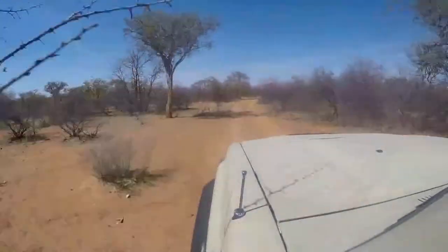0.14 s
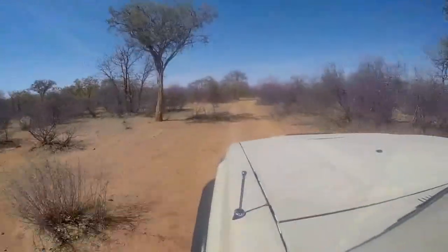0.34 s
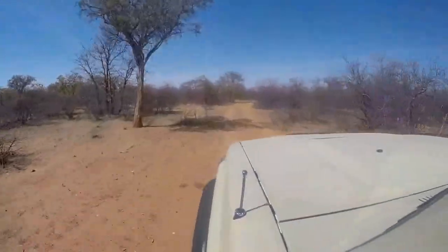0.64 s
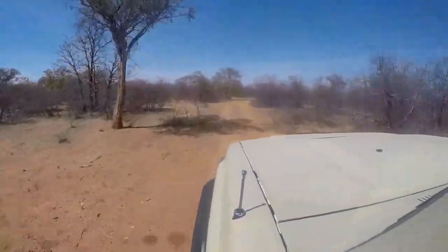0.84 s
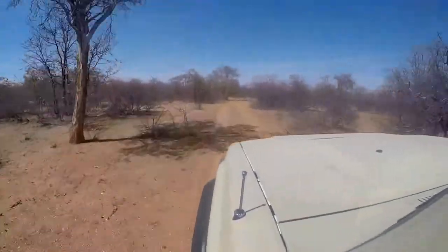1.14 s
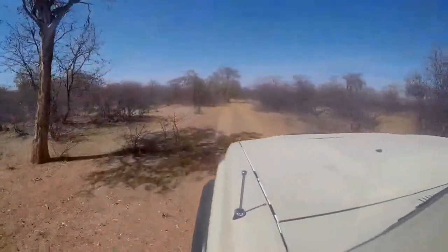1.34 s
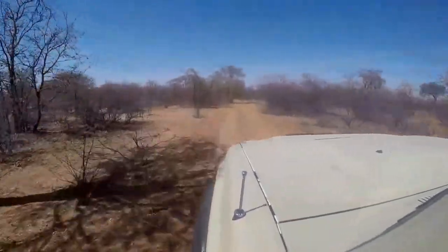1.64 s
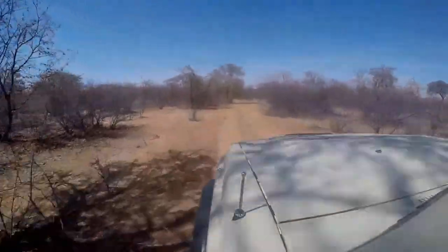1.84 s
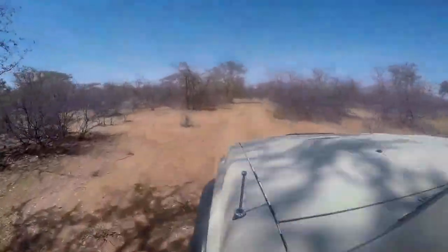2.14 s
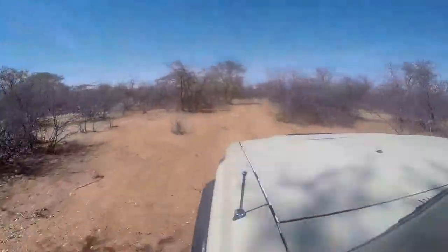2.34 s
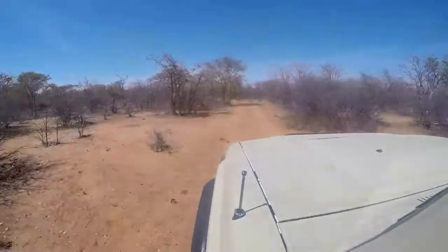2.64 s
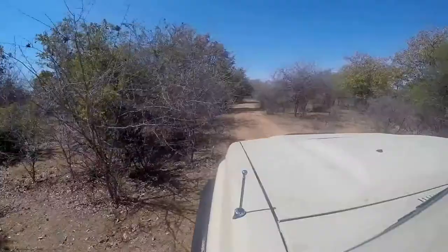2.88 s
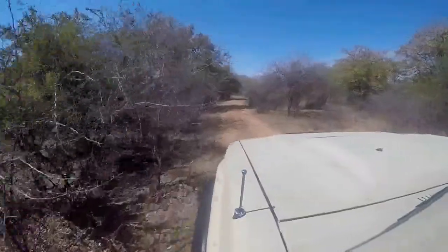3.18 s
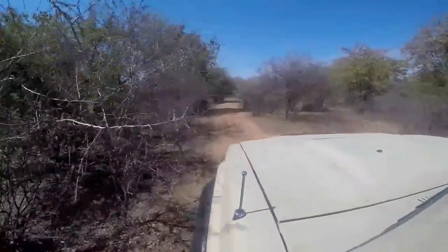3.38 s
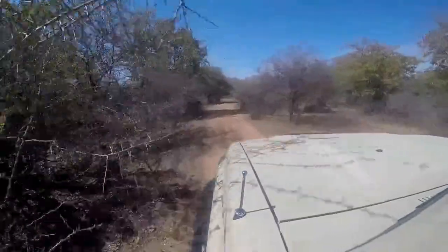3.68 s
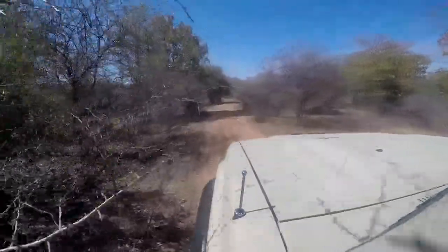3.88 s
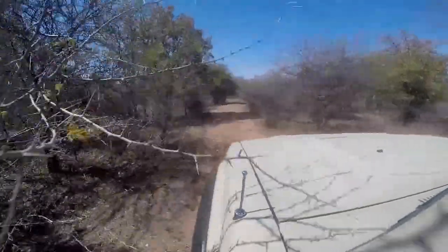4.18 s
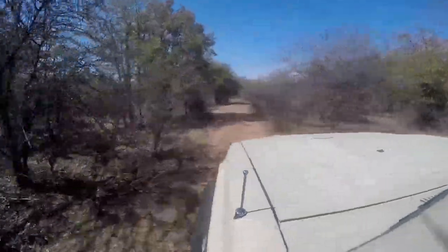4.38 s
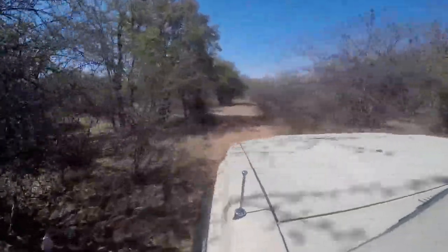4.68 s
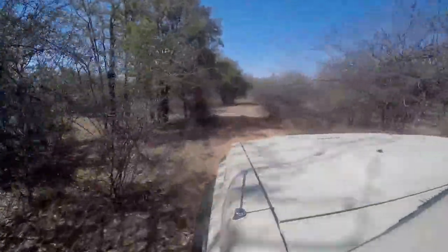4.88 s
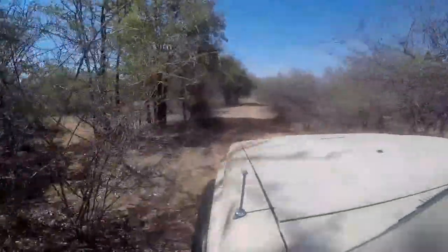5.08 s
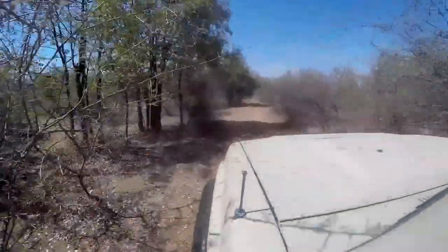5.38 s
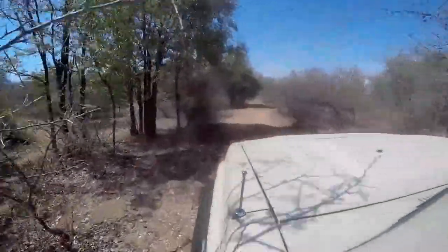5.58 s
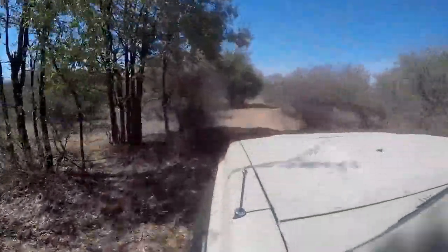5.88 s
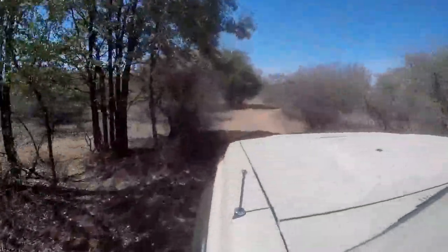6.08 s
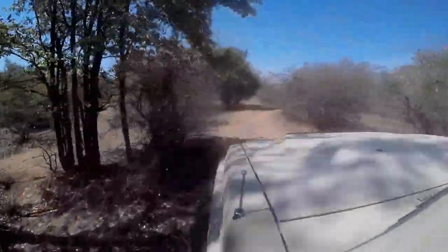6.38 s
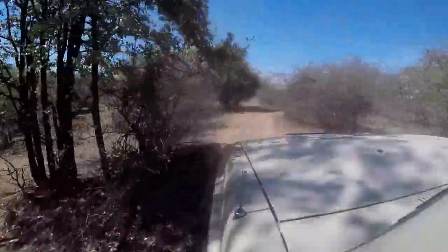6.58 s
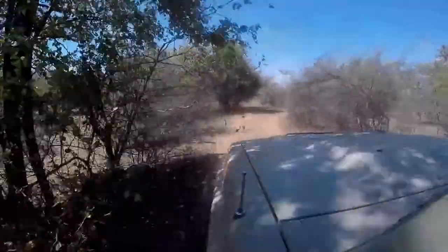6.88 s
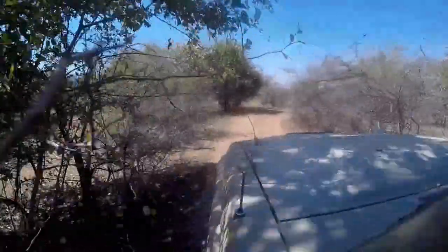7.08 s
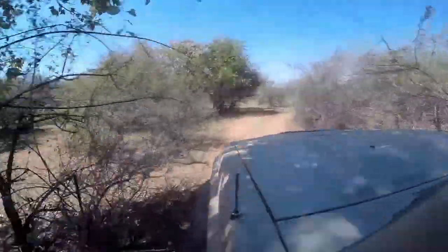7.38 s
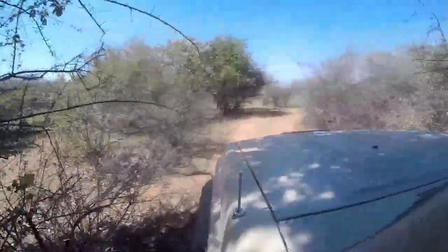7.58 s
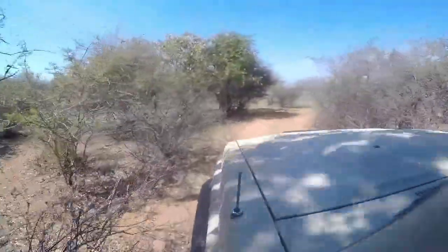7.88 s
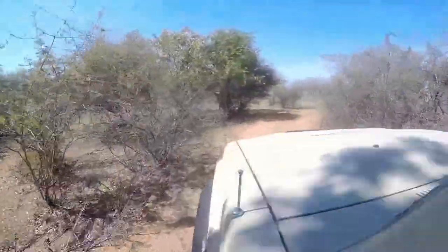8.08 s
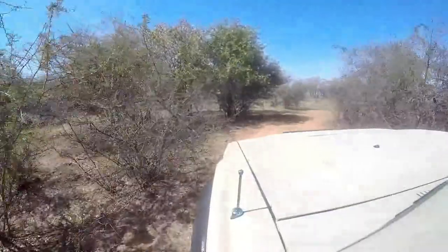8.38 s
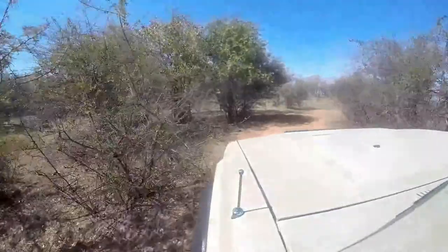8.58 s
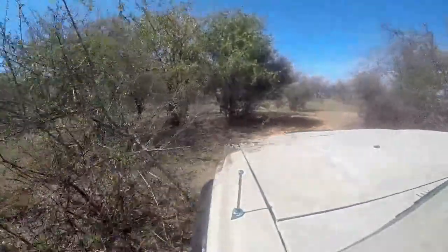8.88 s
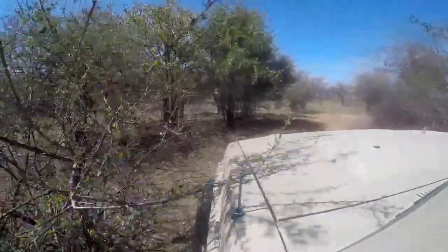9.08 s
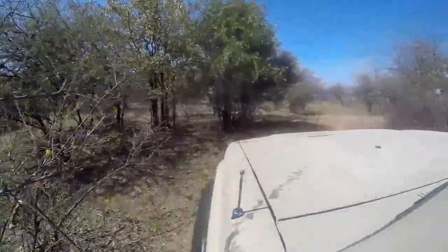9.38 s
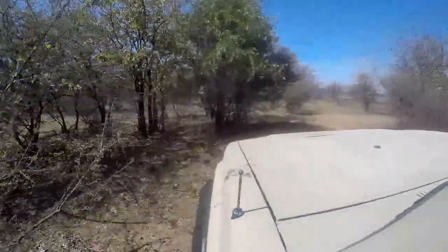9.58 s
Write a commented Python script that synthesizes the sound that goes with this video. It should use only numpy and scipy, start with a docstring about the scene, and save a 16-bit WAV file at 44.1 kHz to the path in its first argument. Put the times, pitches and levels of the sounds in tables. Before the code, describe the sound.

Wind buffets a small microphone on a vehicle rolling down a sandy bush track while thorny twigs crackle, squeal and whip its panels.

```python
"""A thump of wind on the microphone opens the scene, and at once branches smack hard against metal.
A four-wheel-drive rolls slowly along a sandy bush track, heard from a small camera beside the bonnet.
Wind and the drone of engine and tyres are shaped noise that rises and dips along level curves.
Bushes brush along the side as crackling, hissing noise; single branches set body panels ringing.
Narrow noise makes thorn squeals and faint high chirps; wavering tones make a faint gear whine."""
import sys
import numpy as np
from scipy import signal
from scipy.fft import rfft, irfft
from scipy.io import wavfile
from scipy.ndimage import uniform_filter1d

SR = 44100
rng = np.random.default_rng(int(sys.argv[2]) if len(sys.argv) > 2 else 0)


def unload_audio(sound):
    """Save the sound as a 16-bit wav file, at the path given as the first command line argument."""
    columns = np.transpose(np.atleast_2d(sound))
    # keep every value between -1 and 1, then stretch to whole-number steps
    steps = np.round(np.clip(columns, -1, 1) * 32767)
    wavfile.write(sys.argv[1], SR, steps.astype(np.int16))


N = 429534

# gusts: peak_s, swell_db of the buffeting, thump_db, thump_width_s (peak to 1/e)
GUST_TABLE = [(-0.008, 12, -14.5, 0.02), (0.316, 7.5, -23.5, 0.016), (0.589, 12, -25, 0.015),
              (0.967, 12, -21.5, 0.033), (2.791, 17.5, -13, 0.028), (3.081, 4, -19, 0.0053),
              (4.157, 11.5, -35, 0.014), (7.058, 7, -44, 0.014), (7.356, 6, -16, 0.0096),
              (7.393, 3.5, -11, 0.0046)]
# resonances of body panels and housing: pitch_hz, width_hz before widening, relative level_db
BODY_MODES = [(743, 70, 0), (969, 25, -7), (1300, 36, -7), (1870, 49, -8), (2470, 85, -2), (3080, 66, -1),
              (3330, 110, -3), (3670, 33, -6), (4000, 52, -3), (4510, 140, -8), (4830, 51, -7),
              (5710, 65, -10), (6420, 300, -11)]
# airy high noise, for leaves and the top of the drone: pitch_hz, relative level_db (per Hz)
AIRY_SPECTRUM = [(2350, -37), (4000, 6), (4760, 13), (5300, 11), (7170, -0.5), (11300, -3.5), (14300, -3.5),
                 (15300, -3)]
THUD_BELOW_HZ = 1150  # splits the body modes into thud and ring


def from_db(db):
    """Turn decibels into a gain."""
    return 10 ** (np.asarray(db) / 20)


def rms_one(x):
    """Scale a sound to an average strength (rms) of 1."""
    return x / np.sqrt(np.mean(x ** 2) + 1e-20)


def in_time(rows):
    """Draw straight lines between the rows: one curve for each column after the time."""
    times, *columns = np.transpose(rows)
    return [np.interp(np.arange(N) / SR, times, column) for column in columns]


def drift(rate_hz):
    """Slow random wandering of spread 1, made at every 40th sample and joined by lines."""
    r = np.exp(-80 * np.pi * rate_hz / SR)
    noise = rng.standard_normal(N // 40 + 2002)
    slow = signal.lfilter([1], [1, -2 * r, r * r], noise)[2000:]
    return np.interp(np.arange(N) / 40, np.arange(len(slow)), rms_one(slow))


def colour(x, spectrum):
    """Give steady noise a spectrum, at rms 1."""
    hz, db = np.transpose(spectrum)
    f = np.maximum(np.fft.rfftfreq(N, 1 / SR), 1)
    curve_db = np.interp(np.log(f), np.log(hz), db, -90, -90)
    return rms_one(irfft(rfft(x) * from_db(curve_db), N))


def resonate(x, hz, width_hz):
    """Pass sound through one resonance whose top has gain 1."""
    r = np.exp(-np.pi * width_hz / SR)
    top = np.array([1, 0, -1]) * (1 - r * r) / 2
    return signal.lfilter(top, [1, -2 * r * np.cos(2 * np.pi * hz / SR), r * r], x + 1e-18)


def band(x, low_hz, high_hz):
    """Keep one band of pitches, at rms 1."""
    sections = signal.butter(2, [low_hz, high_hz], "band", fs=SR, output="sos")
    return rms_one(signal.sosfilt(sections, x))


def grains(per_s, spread_db):
    """Random contacts of very unequal size, at rms 1."""
    luck_db = spread_db * np.minimum(rng.exponential(1, N), 5)
    sizes = from_db(luck_db) * rng.choice([-1, 1], N)
    return rms_one(sizes * (rng.random(N) < per_s / SR))


def crackle(per_s, spread_db, ring_s):
    """A gain that jumps at each chance touch of a twig and dies quickly, at rms 1."""
    touches = np.abs(grains(per_s, spread_db))
    jumps = signal.lfilter([1], [1, -np.exp(-1 / (ring_s * SR))], touches)
    return rms_one(.5 + rms_one(jumps))


def touch(start_s, length_s, attack_s, release_s):
    """A gain that climbs from 0 to 1, holds, and dies away after its length."""
    t = np.arange(N) / SR - start_s
    return np.clip(t / attack_s, 0, 1) * np.exp(-np.maximum(t - length_s, 0) / release_s)


def strands(modes):
    """Dragged thorns catch panel after panel: each mode swells and fades on its own; rms 1."""
    out = 0
    for hz, width_hz, db in modes:
        catch = from_db(db + 6 * drift(12))
        out = out + catch * rms_one(resonate(grains(1500, 2.5), hz, width_hz + 60))
    return rms_one(out)


def ring_body(contacts, modes, favoured_hz=3000, favour_db=0., luck_db=0.):
    """Contacts set body modes ringing; a boost can favour those near one pitch; rms 1."""
    out = 0
    for k, (hz, width_hz, db) in enumerate(modes):
        near_db = favour_db * np.exp(-(np.log(hz / favoured_hz) / .12) ** 2)
        wide_hz = 1.2 * width_hz + 50
        gain = from_db(db + near_db + luck_db * rng.standard_normal())
        # neighbouring modes alternate in sign
        out = out + (-1) ** k * gain * resonate(contacts, hz, wide_hz) / np.sqrt(wide_hz)
    return rms_one(out)


def wind():
    """Eddies shake the microphone membrane; faster rumble comes in lumps on the pressure peaks."""
    # before the gusts: time_s, buffet_db, rumble_db
    wind_levels = [(0, -16, -26.5), (.9, -18, -29.5), (1.4, -12.5, -26), (2.7, -14.5, -23),
                   (2.93, -24.5, -30), (3.2, -10.5, -27.5), (4.0, -16, -23), (4.3, -18, -28),
                   (4.66, -22.5, -43), (4.9, -28, -42.5), (5.7, -20.5, -30.5), (6.0, -14.5, -29),
                   (6.85, -13.5, -31.5), (7.3, -21.5, -33), (7.58, -33.5, -45), (8.1, -35.5, -43.5),
                   (8.9, -18, -35.5), (9.4, -16.5, -25), (9.74, -28.5, -41)]
    # slow shaking: pitch_hz, relative level_db (per Hz)
    buffet_spectrum = [(8.8, -41), (15, 2), (27, 1.5), (42, 1), (74, -6), (163, -23), (200, -26),
                       (260, -27.5), (440, -120)]
    # faster rumble: pitch_hz, relative level_db (per Hz)
    rumble_spectrum = [(65, -55), (110, 2), (271, -8.5), (311, -6), (380, -10.5), (518, -11), (863, -25.5),
                       (1200, -91), (1560, -42), (2640, -120)]
    swell_s = 0.049  # from a gust's peak until its extra dB fall to 1/e

    buffet_db, rumble_db = in_time(wind_levels)
    buffet = colour(rng.standard_normal(N), buffet_spectrum)
    lumps = from_db(2 * drift(14) + 1.2 * np.abs(buffet))
    rumble = rms_one(lumps * colour(rng.standard_normal(N), rumble_spectrum))
    # the shaking is held steadier in strength than plain noise
    swing = np.sqrt(uniform_filter1d(buffet ** 2, size=1800) + .05)
    buffet = rms_one(buffet / swing ** 0.11)
    t = np.arange(N) / SR
    gust_db = sum(db * np.exp(-((t - peak_s) / swell_s) ** 2) for peak_s, db, *_ in GUST_TABLE)
    return from_db(buffet_db + gust_db) * buffet + from_db(rumble_db) * rumble


def thumps():
    """Gusts thump the microphone: short dull bursts of turbulence, made of low noise."""
    t = np.arange(N) / SR
    swell = sum(from_db(db) * np.exp(-((t - peak_s) / width_s) ** 2)
                for peak_s, _, db, width_s in GUST_TABLE)
    return swell * band(rng.standard_normal(N), 170, 455)


def drone():
    """Engine and tyres give a smooth hiss, while small random contacts make a panel hum."""
    # time_s, hiss_db, panel hum_db
    drone_levels = [(0, -31, -35), (.75, -43.5, -40), (1.1, -45.5, -44.5), (1.7, -43, -38),
                    (2.7, -42.5, -39), (2.88, -48, -42), (3.08, -48.5, -42), (3.14, -41, -35),
                    (4.23, -42, -37.5), (4.64, -65, -51), (4.8, -54.5, -52), (5.5, -57.5, -49),
                    (6.2, -47, -38.5), (7.3, -52, -41), (7.6, -48.5, -40), (8.1, -63, -53.5),
                    (8.6, -53.5, -40.5), (9.74, -33, -38)]
    # main part of the hiss: pitch_hz, relative level_db (per Hz)
    hiss_spectrum = [(530, -41), (900, 12.5), (1150, 11), (1500, 6), (1640, 10), (2470, 7.5), (3030, 9.5),
                     (3600, 0), (4770, -2), (5200, 1.5), (9000, -27.5), (11700, -99), (19800, -120)]
    # narrow bands in the hiss: pitch_hz, width_hz, level_db against its main part
    engine_bands = [(1590, 44, -13.5), (2903, 85, -6.5)]
    airy_db = -15.5  # airy top, against the main part of the hiss

    hiss_db, hum_db = in_time(drone_levels)
    hiss = colour(rng.standard_normal(N), hiss_spectrum)
    for hz, width_hz, db in engine_bands:
        hiss = hiss + from_db(db) * rms_one(resonate(rng.standard_normal(N), hz, width_hz))
    hiss = hiss + from_db(airy_db) * colour(rng.standard_normal(N), AIRY_SPECTRUM)
    hum = band(resonate(grains(800, 1.6), 627, 96), 300, 1500)
    return from_db(hiss_db) * hiss + from_db(hum_db) * hum


def whines():
    """Gears whine faintly: a tone wavers in pitch and strength as it fades in and out."""
    # start_s, length_s, first_pitch_hz and last_pitch_hz before wavering, level_db before flutter
    whine_table = [(2.351, 0.695, 424, 416.8, -36), (4.902, 1.1, 601, 553, -47)]
    out, t = np.zeros(N), np.arange(N) / SR
    waver, flutter = drift(7.0), from_db(7.2 * drift(4.8))
    for start_s, length_s, first_hz, last_hz, db in whine_table:
        glide_hz = np.interp(t, [start_s, start_s + length_s], [first_hz, last_hz])
        turn = 2 * np.pi * np.cumsum(glide_hz * (1 + 0.00733 * waver)) / SR
        fade = touch(start_s, length_s, 0.29, 0.039)
        out += fade * from_db(db) * flutter * np.sqrt(2) * np.sin(turn)
    return out


def chirps():
    """Faint high chirps: short puffs of noise in two narrow bands."""
    # start_s, level_db before the puff is smoothed
    chirp_table = [(2.6015, -45), (2.9682, -53), (3.5224, -47), (3.7494, -42), (4.0372, -45), (5.413, -51),
                   (6.2622, -43), (6.9097, -38)]
    # pitch_hz, width_hz of each of two passes, level_db
    chirp_bands = [(13460, 440, -3), (9700, 400, -14.5)]
    start_s, db = np.transpose(chirp_table)
    starts = np.zeros(N)
    starts[np.round(start_s * SR).astype(int)] = from_db(db)
    r = np.exp(-1 / (0.022 * SR))  # each puff dies over 22 ms
    puffs = uniform_filter1d(signal.lfilter([1], [1, -r], starts + 1e-18), size=300)
    noise = rng.standard_normal(N)
    tone = 0
    for hz, width_hz, level_db in chirp_bands:
        narrow = resonate(resonate(noise, hz, width_hz), hz, width_hz)
        tone = tone + from_db(level_db) * rms_one(narrow)
    return puffs * tone


def brushes():
    """Bushes drag along the side: twigs crackle on panels, leaves hiss, the low panels scrape."""
    # start_s, length_s, twigs_db, leaves_db, low_scrape_db, change_db over the pass
    brush_table = [(0.034, 0.34, -25, -38.5, -25, -4), (0.312, 0.56, -41, -39.5, -38.5, -14),
                   (2.05, 0.36, -42.5, -39.5, -41, -32), (2.22, 0.31, -65, -40.5, -54, -2.5),
                   (4.213, 0.44, -50, -49, -46, -0.5), (4.661, 0.96, -56, -61, -60, 1),
                   (5.6, 0.39, -49, -53, -46, 12), (5.965, 0.41, -40, -47.5, -35.5, -1.5),
                   (6.345, 0.38, -34.5, -40.5, -33, -8.5), (6.684, 0.46, -48.5, -46.5, -61, -0.5),
                   (7.124, 0.32, -51.5, -52, -41, 2), (7.6, 0.406, -49.5, -49.5, -48, -14.5),
                   (7.845, 0.29, -50, -50, -72, -5), (8.12, 0.74, -43.5, -45.5, -44, -2),
                   (8.77, 0.87, -51.5, -52, -52.5, 12), (9.273, 0.26, -39.5, -44, -24, 1),
                   (9.561, .25, -44, -51, -25, -6.5)]
    attack_s, release_s = 0.039, 0.00073

    touching = crackle(160, 2.6, .003)
    patter = grains(8000, 2.5) * touching
    high = [mode for mode in BODY_MODES if mode[0] > THUD_BELOW_HZ]
    twigs = rms_one(strands(high) + 1.3 * band(patter, 1070, 4100))
    leaves = colour(rng.standard_normal(N) * (0.26 + touching), AIRY_SPECTRUM)
    low_panels = strands(BODY_MODES[:1]) + .3 * strands(BODY_MODES[1:3])
    scrape = rms_one(low_panels + .5 * band(patter, 480, 900))
    strength, t = np.zeros((3, N)), np.arange(N) / SR
    for start_s, length_s, *levels_db, change_db in brush_table:
        change = from_db(change_db * np.clip((t - start_s) / length_s, 0, 1))
        shape = change * touch(start_s, length_s, attack_s, release_s)
        strength += from_db(levels_db)[:, None] * shape
    return np.sum(strength * [twigs, leaves, scrape], axis=0)


def squeals():
    """A thorn squeals on paint: gritty noise around a slightly sagging pitch swells and fades."""
    # start_s, length_s, first pitch_hz, level_db before the swell and fade
    squeal_table = [(0.16, 0.18, 1270, -27), (0.16, 0.15, 3230, -30), (0.064, 0.11, 2305, -31),
                    (2.243, 0.045, 1320, -29), (2.297, .09, 3150, -40), (5.04, 0.08, 4950, -51),
                    (5.128, 0.24, 5030, -49), (5.81, .155, 760, -25), (6.48, 0.22, 5000, -36),
                    (9.3, .1, 760, -28), (9.554, 0.079, 2080, -32), (0.608, 0.1, 5150, -43),
                    (8.29, 0.37, 4940, -45), (8.66, 0.045, 5150, -41)]
    sag, half_width = .03, .052  # shares of the pitch
    out = np.zeros(N)
    grit = from_db(3 * drift(25) - 2) * crackle(400, 2., .003)
    noise = rng.standard_normal((2, N)) * grit
    for start_s, length_s, hz, db in squeal_table:
        at = round(start_s * SR)
        done = np.arange(round(length_s * SR)) / (length_s * SR)
        span = slice(at, at + len(done))
        low_pass = signal.butter(1, half_width * hz, fs=SR, output="sos")
        wobble = rms_one(signal.sosfilt(low_pass, noise[:, span]))
        turn = 2 * np.pi * np.cumsum(hz * (1 - sag * done)) / SR
        # slow noise on a cosine and a sine makes a narrow band around the pitch
        squeal = wobble[0] * np.cos(turn) + wobble[1] * np.sin(turn)
        out[span] += from_db(db) * np.sin(np.pi * done) ** .5 * squeal
    return out


def twig_skips():
    """A springy twig skips along a ridge: evenly spaced small blows of uneven strength."""
    start_s, skips_per_s, skips = 6.9315, 117, 9
    loudest_db, thud_db, pitch_hz, contact_s = -24, -22, 4100, .002
    return [(start_s + k / skips_per_s, loudest_db - 9 * rng.random(), thud_db, pitch_hz, contact_s)
            for k in range(skips)]


def whips():
    """Branches whip the body: a rattle of contacts rings low and high modes and adds a crack."""
    # start_s, ring_db, thud_db against the ring, favoured pitch_hz, contact_s
    blow_table = [(0.064, -25, -13, 1910, 0.027), (.066, -32, -9, 4500, 0.05),
                  (0.152, -12.5, -1.5, 2000, 0.0028), (0.158, -4, -9.5, 4500, 0.0027),
                  (0.169, -18.5, -20, 2500, 0.019), (0.305, -26, 2, 1350, 0.029),
                  (0.3448, -5, -3, 2800, 0.0011), (0.505, -34, -12, 3080, 0.0094),
                  (2.243, -30.5, 1.5, 1870, 0.053), (2.275, -27, -6, 4730, 0.0043),
                  (2.298, -35.5, 2, 4830, 0.1), (2.483, -42, -20, 4770, 0.013),
                  (3.185, -44, 21, 1290, 0.0033), (3.8598, -17.5, 9.5, 2380, 0.012),
                  (4.199, -28, -20, 5670, 0.0075), (4.2669, -7, -0.5, 2740, 0.009),
                  (4.268, -12.5, -3, 1330, 0.017), (4.294, -18, -4, 2800, 0.026),
                  (4.466, -13, 6, 2350, 0.018), (4.513, -28, 4, 1320, 0.016), (4.537, -30, 3, 1300, 0.019),
                  (4.555, -28.5, 5, 2180, 0.043), (4.5784, -6.5, 0.5, 3180, 0.0097),
                  (4.593, -13, -4, 4540, 0.0082), (4.635, -35, -31, 2550, 0.012),
                  (4.692, -43.5, -4, 3000, 0.0062), (4.714, -46.5, 6, 2500, 0.011),
                  (5.61, -50, -20, 5200, 0.0034), (5.699, -34.5, 1, 2880, 0.0056),
                  (5.748, -34.5, -22, 4900, 0.039), (5.79, -19, -5.5, 3000, 0.016),
                  (5.806, -21, -0.5, 2080, 0.059), (5.917, -34, -20, 4530, .008),
                  (5.989, -18, -10, 2000, 0.022), (5.991, -18, 0.5, 4870, 0.017),
                  (6.085, -38, -15, 4000, 0.0043), (6.187, -27, 2.5, 2100, 0.016),
                  (6.297, -34, -17, 4800, 0.0097), (6.358, -33.5, 3, 2100, 0.012),
                  (6.418, -42.5, 18.5, 1300, 0.052), (6.486, -29, -3, 2900, 0.014),
                  (6.507, -32, -15, 4700, 0.055), (6.631, -36, -12, 4500, 0.009),
                  (7.319, -10, 0.5, 3500, 0.0044), (7.33, -14, -21, 1450, 0.0059),
                  (7.341, -3, -7, 4170, 0.014), (7.356, -24.5, 12, 3000, 0.0078),
                  (7.369, -20, 1, 3100, 0.0034), (7.39, -22, 15, 1300, 0.008),
                  (7.402, -14, -23, 2020, 0.0021), (7.43, -22, -1, 2400, 0.012),
                  (7.579, -24.5, 5, 1520, 0.008), (7.603, -28.5, 5.5, 2030, 0.0049),
                  (7.616, -16.5, 1, 1300, 0.0028), (7.627, -28, 4, 2520, 0.013),
                  (7.654, -34.5, 0.5, 2530, 0.025), (7.756, -41, -18, 1900, 0.012),
                  (7.802, -41, 4.5, 2200, 0.0073), (7.884, -41, -0.5, 1330, 0.022),
                  (8.151, -31, -4, 5000, 0.0053), (8.176, -24.5, -1, 2830, 0.0089),
                  (8.21, -31, -4, 4700, 0.0029), (8.241, -36, -13, 3920, .005),
                  (8.377, -32, 0, 1550, 0.0053), (8.458, -28, -6, 4600, 0.011),
                  (8.545, -28, -23, 4100, 0.0049), (9.53, -13, -26, 2240, 0.011),
                  (9.537, -4.5, -14, 4940, 0.0066), (9.545, -7, -8, 3100, 0.0078),
                  (9.552, -8.5, -21, 3500, 0.0053), (9.57, -12.5, -19, 3700, 0.013),
                  (9.591, -20, -2.5, 2800, 0.0087), (9.6, -35, 6, 2030, 0.014),
                  (9.669, -17, -14, 2900, 0.0065)]
    slide_in, treble_s = .2, .009  # share of contact beyond 25 ms spent sliding in; treble decay
    crack_3khz_db, crack_db_per_octave, crack_s = -29, -5.5, 0.0031  # higher pitch, weaker crack
    loss_per_thud = 0.48  # dB of crack and late treble lost per dB of thud
    tail_db, tail_s = -10.5, 0.014  # two panels rattle on after the crack
    boom_hz, boom_width_hz, boom_db = 163.2, 8.5, -11  # the whole body, level against the thud

    out, t = np.zeros(N + 8192), np.arange(8192) / SR
    low = [mode for mode in BODY_MODES if mode[0] < THUD_BELOW_HZ]
    high = [mode for mode in BODY_MODES if mode[0] > THUD_BELOW_HZ]
    for start_s, ring_db, thud_db, favoured_hz, contact_s in blow_table + twig_skips():
        # quick onset (long contacts slide in), a sagging hold, then the branch lets go
        onset = np.minimum(t / (.0005 + slide_in * max(contact_s - .025, 0)), 1)
        let_go = np.maximum(t - .8 * contact_s, 0) / (.003 + .25 * contact_s)
        shape = onset * np.exp(-.9 * t / contact_s - let_go)
        uneven = from_db(3.54 * rng.exponential(1, len(t)))
        rattle = shape * rng.standard_normal(len(t)) * uneven

        ring = ring_body(rattle, high, favoured_hz, favour_db=13., luck_db=3.)
        low_pass = signal.butter(3, max(3400, 1.2 * favoured_hz), fs=SR, output="sos")
        dull = signal.sosfilt(low_pass, ring)
        # the treble dies first, and heavy thuds have less of it
        treble = (ring - dull) * np.exp(-t / treble_s) * from_db(-loss_per_thud * max(thud_db, 0))
        slap = band(rattle, favoured_hz / 1.7, favoured_hz * 1.5)
        ring = rms_one(dull + treble + .5 * slap)

        thud = band(ring_body(rattle, low) + .5 * band(rattle, 450, 900), 250, 1700)
        octaves = np.log2(favoured_hz / 3000)
        crack_db = crack_3khz_db + crack_db_per_octave * octaves - loss_per_thud * thud_db
        crack = band(rattle * np.exp(-t / crack_s), 10600, 16200)
        after = band(rng.standard_normal(len(t)), 480, 3200) * np.exp(-t / tail_s)
        tail = ring_body(after, BODY_MODES[4:5])
        tail = tail + from_db(thud_db) * ring_body(after, BODY_MODES[:1])
        boom = rms_one(resonate(rattle, boom_hz, boom_width_hz))

        blow = ring + from_db(thud_db) * thud + from_db(crack_db) * crack
        blow = blow + from_db(tail_db) * tail + from_db(thud_db + boom_db) * boom
        # spread over the contact time instead of the whole 8192 samples
        at, share = round(start_s * SR), contact_s * SR / len(t)
        out[at:at + len(t)] += from_db(ring_db) * np.sqrt(share) * blow
    return out[:N]


def scene():
    """All sources reach one microphone."""
    background = wind() + thumps() + drone() + whines() + chirps()
    return (background + brushes() + squeals() + whips())[None]


def record(dry):
    """Loud peaks are flattened softly, then a steep filter cuts the top."""
    cutoff_hz = 15250
    clipped = .97 * dry / (1 + np.abs(dry / .97) ** 4) ** .25
    return signal.sosfilt(signal.ellip(12, .5, 70, cutoff_hz, fs=SR, output="sos"), clipped)


dry = scene()
out = record(dry)
unload_audio(out)
```